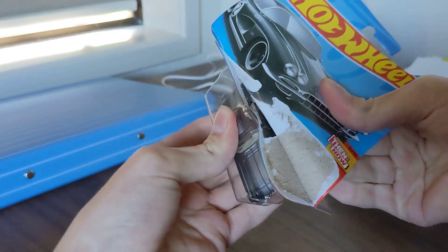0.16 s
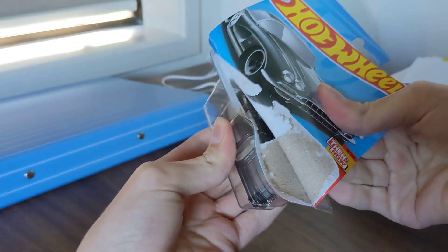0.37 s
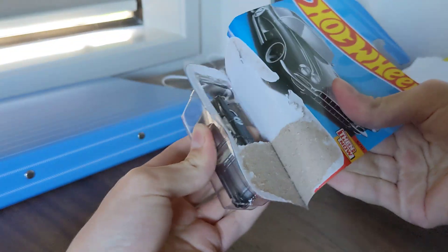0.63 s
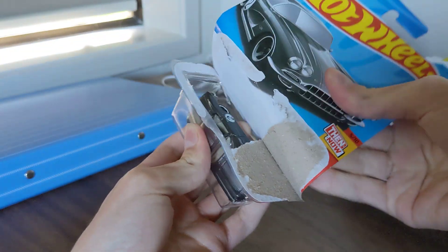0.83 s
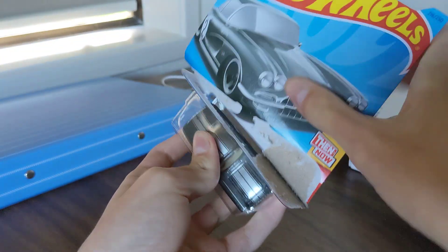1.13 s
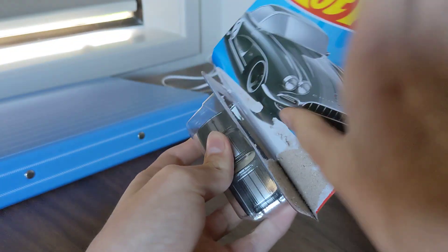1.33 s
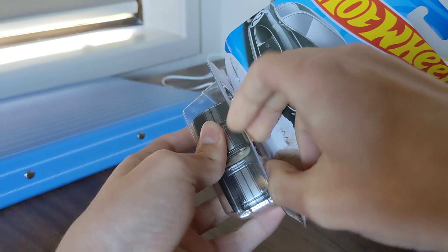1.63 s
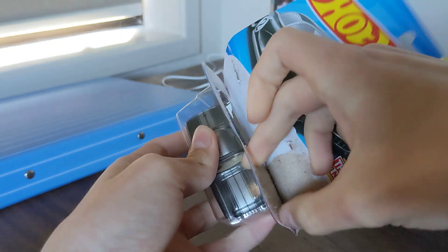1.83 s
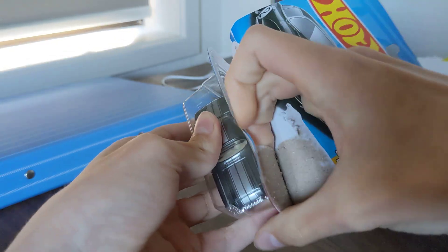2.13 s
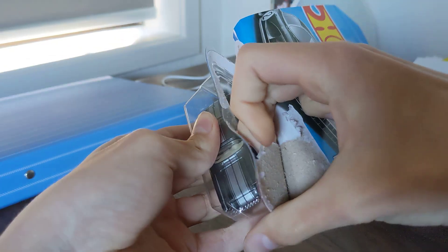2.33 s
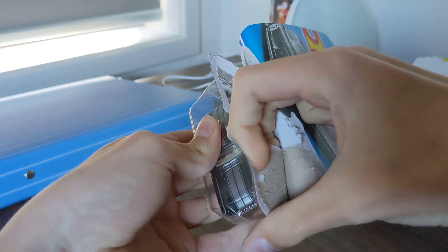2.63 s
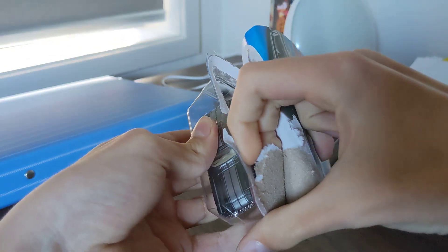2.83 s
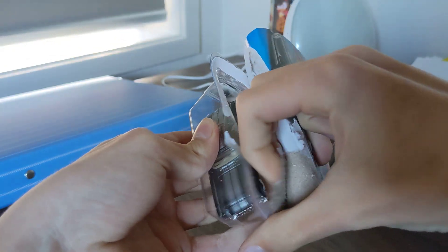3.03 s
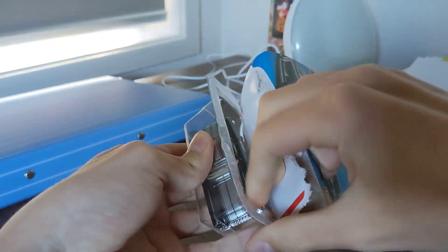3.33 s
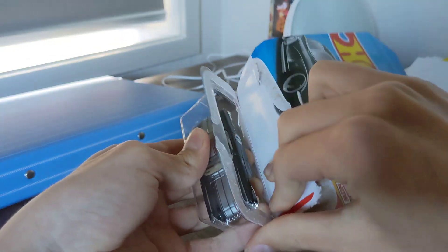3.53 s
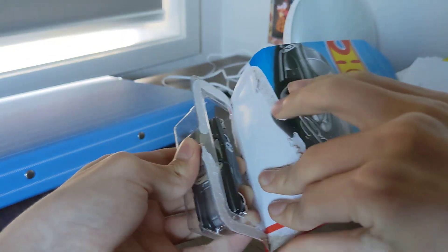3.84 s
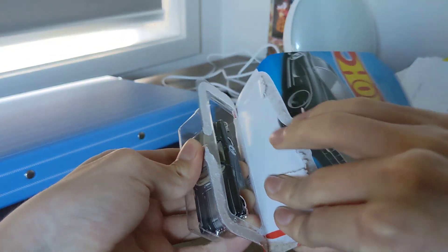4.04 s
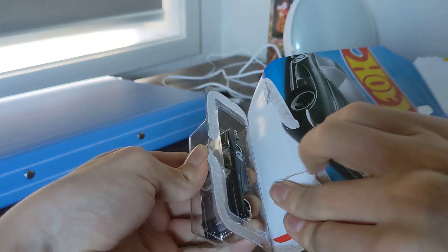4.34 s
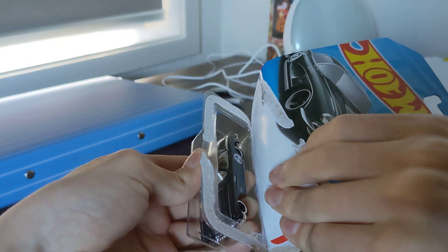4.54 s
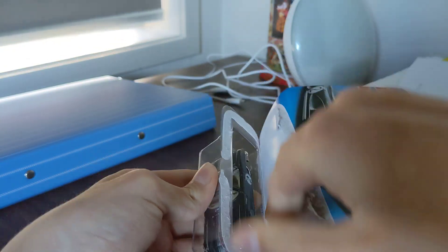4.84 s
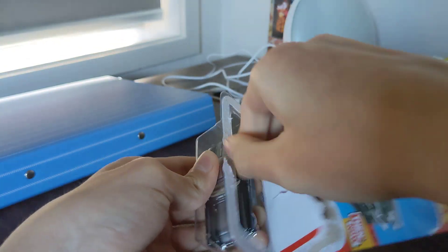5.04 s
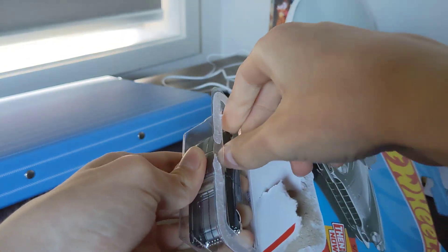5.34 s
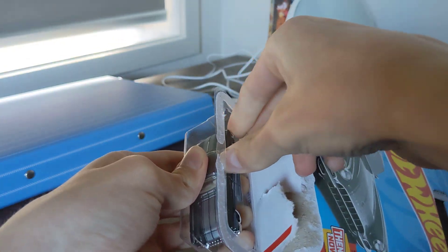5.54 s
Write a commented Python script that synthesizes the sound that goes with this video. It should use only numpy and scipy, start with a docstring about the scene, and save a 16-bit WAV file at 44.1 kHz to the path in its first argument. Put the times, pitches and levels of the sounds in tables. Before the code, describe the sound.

In a small room, close to the microphone and a little left, thin plastic packaging is pried off a card in fits and starts. The plastic clicks, creaks and pops while the cardboard gives way in brief, dry rips. The strongest tear comes early, more clusters of crackling follow, and the last part thins to softer ticks and snaps. Barely audible bird chirps and a fading low hum lie underneath.

```python
"""Peeling a blister pack

Hands peel a plastic blister from its card in a small room, close to a phone and a little to its left.
Paper fibres fracture singly and in dense tears; stick-slip of the glue and buckling excite the shell's
modes as creaks and hollow pops. A short room tail, faint birds and a fading mains hum lie underneath."""
import sys
import numpy as np
from scipy import signal
from scipy.fft import rfft, irfft, next_fast_len
from scipy.io import wavfile
from scipy.ndimage import uniform_filter1d

SR = 44100
rng = np.random.default_rng(int(sys.argv[2]) if len(sys.argv) > 2 else 0)


def store_pcm(level_fs):
    """Save levels as 16-bit WAV."""
    pcm = np.round(np.clip(level_fs, -1, 1) * 32767).astype(np.int16)
    wavfile.write(sys.argv[1], SR, np.atleast_2d(pcm).T)


N = 250488
T = np.arange(N) / SR
LN_1000 = np.log(1000)  # an amplitude decay of 60 dB

# steady pull between the runs of tearing: time_s, tear_db, creak_db, treble_db
STEADY_PULL = [(0.0, -58, -46.5, 8.5), (0.35, -49.5, -72, -3.5), (0.74, -66.5, -69, -0.5),
               (0.96, -67.5, -72, -26), (1.19, -49.5, -53, -21), (1.3, -71, -65.5, -36),
               (1.659, -61, -63, -9), (2.15, -69, -71.5, -26), (2.2, -66.5, -68, 13),
               (2.47, -54, -55.5, -0.5), (3.11, -67.5, -64.5, 8.5), (3.3, -63, -64.5, -9.5),
               (3.69, -70.5, -68, 10.5), (4.061, -55, -82, -5), (4.511, -61, -84, 0.5),
               (4.97, -64, -65, -8), (5.36, -64.5, -66, -19), (5.68, -71.5, -72.5, 7)]
# buckling of the shell: start_s, level_db, centre_hz
BUCKLES = [(0.266, -18, 710), (0.419, -19.5, 760), (0.45, -7.5, 1032), (0.626, -41.5, 1300),
           (0.869, -47, 1330), (0.919, -29.5, 460), (1.083, -35.5, 420), (1.088, -29, 543),
           (1.152, -35, 1820), (1.246, -16.5, 930), (1.323, -31.5, 1300), (1.511, -42, 1340),
           (1.569, -29, 830), (1.59, -28, 1200), (1.9, -33.5, 940), (1.958, -40, 800), (2.331, -43, 1410),
           (2.363, -40, 1720), (2.381, -28, 1510), (2.449, -34, 2040), (2.531, -36, 1900),
           (2.572, -38, 1682), (2.623, -38, 1670), (2.77, -33, 1900), (2.9, -36, 1760),
           (3.103, -28.5, 1480), (3.146, -18.5, 1800), (3.292, -37.5, 814), (3.439, -36.5, 1440),
           (3.473, -37, 1360), (3.489, -26, 1670), (3.549, -41.5, 930), (4.023, -47, 1850),
           (4.073, -41, 2260), (4.832, -50, 1240), (4.881, -60, 1260), (4.952, -38.5, 634),
           (5.088, -48, 1560), (5.165, -31, 1810), (5.288, -36.5, 1820), (5.322, -26, 1970),
           (5.522, -47, 1350)]
# modes of shell and card: frequency_hz, bandwidth_hz, gain_db
SHELL_MODES = [(348.6, 200, -17.5), (526, 360, -3), (810, 277, -2), (1168, 150, -6.5), (1382, 85, -3),
               (1626, 240, -3), (1836, 210, -1.5), (2296, 170, -2.5), (3260, 170, -6.5)]
# spectrum of tearing paper: frequency_hz, gain_db
PAPER_SPECTRUM = [(1180, -29.5), (2000, -21), (2830, -11), (3260, -13), (4450, -10.5), (5780, -14),
                  (7060, -11.5), (7640, -16), (8400, -13.5), (10600, -19), (11600, -14.5), (15100, -13),
                  (16000, -7)]


def peel():
    """Fibre fracture makes dense clicks; stick-slip of the glue drives the modes near the buckling pitch."""
    time_s, tear_db, creak_db, _ = np.transpose(STEADY_PULL)
    steady = undb([np.interp(T, time_s, tear_db), np.interp(T, time_s, creak_db)])
    tear, creak = tearing_runs() + steady
    buckle_s, _, buckle_hz = np.transpose(BUCKLES)
    centre_hz = np.interp(T, buckle_s, buckle_hz)
    fibres = clicks(per_s=9000, spread_db=2.5) * undb(1.9 * walk(150))
    slips = clicks(per_s=3400, spread_db=2.5) * undb(2.46 * walk(80))
    shell, power = 0, 0
    for k, (hz, width, db) in enumerate(SHELL_MODES):
        share = undb(db - 3.94 * np.log2(hz / centre_hz) ** 2)
        mode = unit(resonate(slips, hz, q=hz / width)) * (-1) ** k
        shell = shell + share * undb(1.3 * walk(25)) * mode
        power = power + share ** 2
    return tear * unit(colour(fibres, PAPER_SPECTRUM)) + creak * shell / np.sqrt(power)


def tearing_runs():
    """Envelopes of tearing and creaking: each run swells, holds and decays exponentially."""
    # runs of tearing: start_s, rise_s, hold_s, t60_s, tear_db, creak_db
    runs = [(0.146, .003, 0.0084, 0.2, -59, -69), (0.246, 0.015, .021, 0.19, -53, -38.5),
            (0.411, .005, 0.0088, .12, -29, -42), (0.427, 0.021, 0.024, 0.18, -19, -21.5),
            (0.692, 0.042, 0.018, 0.11, -51, -57), (0.894, 0.0033, 0.038, 0.17, -59, -57),
            (1.032, 0.053, 0.0097, 0.048, -55, -36.5), (1.138, 0.0077, 0.036, 0.22, -55, -46),
            (1.234, .003, 0.035, 0.16, -35, -35.5), (1.317, 0.0045, 0.02, 0.029, -55, -49.5),
            (1.438, 0.038, 0.017, 0.1, -50.5, -53), (1.501, 0.011, 0.072, 0.15, -42, -42.5),
            (1.648, 0.043, 0.021, .043, -44.5, -48.5), (1.874, .012, 0.077, 0.041, -50.5, -52),
            (2.32, 0.076, 0.046, .16, -38, -39), (2.524, 0.0032, 0.016, 0.16, -44, -82),
            (2.758, 0.0087, 0.028, 0.13, -47.5, -47.5), (2.893, 0.0045, .14, .1, -60.5, -55.5),
            (3.079, 0.023, 0.0068, 0.24, -41, -45), (3.133, 0.011, 0.016, 0.11, -26.5, -29.5),
            (3.266, 0.013, 0.016, 0.055, -40, -57), (3.418, 0.0048, 0.028, 0.1, -49, -50.5),
            (3.472, 0.014, 0.014, 0.17, -41, -39), (3.617, 0.006, .02, 0.066, -60.5, -84),
            (3.704, 0.0097, .03, 0.072, -57.5, -71), (3.861, 0.044, 0.023, 0.16, -50, -55),
            (4.02, 0.0024, 0.084, 0.056, -48.5, -58), (4.179, 0.028, 0.051, 0.097, -54, -61),
            (4.351, 0.0071, .05, 0.14, -59, -70.5), (4.524, .003, 0.031, 0.094, -57.5, -65.5),
            (4.879, 0.0012, 0.01, .093, -53.5, -47.5), (4.937, 0.0046, 0.042, 0.16, -51.5, -52),
            (5.142, 0.015, 0.017, 0.17, -45, -44.5), (5.31, 0.0039, .008, 0.17, -50, -49),
            (5.534, 0.014, 0.024, .12, -56.5, -56.5)]
    out = np.zeros((2, N))
    for start, rise, hold, t60, *db in runs:
        t = T - start
        swell = np.clip(t / rise, 0, 1) ** 2
        decay = np.exp(-LN_1000 * np.maximum(t - rise - hold, 0) / t60)
        out += undb(db)[:, None] * swell * decay
    return out


def snaps():
    """Brittle fracture: a millisecond crack with a short fizz, and an impulse that rings the shell."""
    # single fibres and glue spots letting go: start_s, relative_db
    fractures = [(0.1281, -39.5), (0.2083, -38), (0.223, -37), (0.2688, -28.5), (0.4189, -18.5),
                 (0.4489, -9.5), (0.626, -40), (0.7282, -43), (0.738, -30), (0.7465, -40), (0.919, -28),
                 (1.062, -34), (1.0874, -32), (1.2461, -24), (1.324, -36), (1.5274, -36), (1.5529, -29),
                 (1.7, -27), (1.9031, -29), (2.212, -48), (2.2337, -47.5), (2.297, -41), (2.3371, -43),
                 (2.354, -49), (2.3635, -31), (2.375, -26.5), (2.3818, -26), (2.409, -35), (2.417, -20),
                 (2.43, -35), (2.4501, -26), (2.474, -41), (2.5316, -30), (2.5494, -39), (2.6244, -43),
                 (2.7601, -61), (2.7823, -32), (2.827, -41.5), (2.8842, -43), (2.8988, -41), (2.9526, -41),
                 (3.1035, -30.5), (3.1352, -15), (3.4156, -38), (3.474, -36), (3.491, -24.5), (3.5503, -45),
                 (3.7045, -55), (3.718, -53), (3.731, -39), (3.742, -50), (3.784, -36.5), (3.848, -45),
                 (3.9097, -35), (3.966, -40), (4.0228, -32), (4.0695, -31), (4.0987, -26), (4.229, -45),
                 (4.2696, -43), (4.468, -45), (4.534, -46.5), (4.6359, -45), (4.952, -38), (5.1594, -31),
                 (5.2885, -43), (5.3246, -30), (5.3858, -38.5), (5.5822, -43)]
    crack, knock, t = np.zeros(N), np.zeros(N), np.arange(900) / SR
    burst = np.exp(-((t - .002) / 0.00089) ** 2)
    fizz = .08 * (t > .002) * np.exp(-t / 0.02)
    for start, db in fractures + small_snaps():
        add(crack, start - .001, undb(db) * (burst + fizz) * rng.standard_normal(len(t)))
        add(knock, start, undb(db - 13.5) * shell_ring(2900, base_t60_s=0.03, focus_db=4.5))
    return undb(10) * colour(crack, PAPER_SPECTRUM) + knock


def small_snaps(per_s=12, above_tear_db=3.5, spread_db=4):
    """A random point process: times and levels of faint snaps, louder where the steady tearing is."""
    time_s, tear_db = np.transpose(STEADY_PULL)[:2]
    position, size = rng.random((int(per_s * N / SR), 2)).T
    starts = .002 + position * (N / SR - .002)
    levels = np.interp(starts, time_s, tear_db) + above_tear_db - spread_db * np.log(1 - size)
    return list(zip(starts, levels))


def brighten(x):
    """A varying treble shelf follows the peel: thin paper tears brighter than thick card."""
    time_s, _, _, treble_db = np.transpose(STEADY_PULL)
    return x + (undb(np.interp(T, time_s, treble_db)) - 1) * highpass(x, 6500, order=1)


def pops(ring_cycles=36):
    """Buckling excites the shell's modes in hollow pops; low pops ring longer."""
    out = np.zeros(N)
    for start, db, hz in BUCKLES:
        add(out, start, undb(db) * shell_ring(hz, base_t60_s=ring_cycles / hz, focus_db=8.0))
    return highpass(out, 290, order=2)  # a small shell radiates little bass


def shell_ring(centre_hz, base_t60_s, focus_db):
    """Free vibration as a sum of damped modes, weighted towards centre_hz; peak 1."""
    t = np.arange(4000) / SR
    hz, width, db = np.transpose(SHELL_MODES)
    uneven, detune = rng.standard_normal((2, len(hz)))
    gain = undb(db - focus_db * np.log2(hz / centre_hz) ** 2 + 3.5 * uneven)
    damping = LN_1000 / base_t60_s + 0.58 * width  # broad modes die sooner
    phase = 2 * np.pi * hz * (1 + 0.058 * detune) * t[:, None]
    x = (gain * np.sin(phase) * np.exp(-damping * t[:, None])).sum(1)
    x *= 1 - np.exp(-t / 0.0019)  # the fold takes a moment to give
    return x / np.abs(x).max()


def thuds(t60_s=.11):
    """The card flexes like a membrane after some pops: soft, uneven bumps whose pitch sags and wobbles."""
    # flexing of the card: start_s, level_db, nominal_hz
    flexes = [(0.454, -40, 307), (0.925, -40, 175), (1.097, -52, 195), (1.249, -37.5, 186),
              (1.512, -39, 242), (1.57, -46.5, 298), (3.141, -46, 280), (5.166, -50, 241)]
    out, t = np.zeros(N), np.arange(SR // 5) / SR
    wobble = 1 + .22 * walk(120)
    sag = .75 + .9 * np.exp(-t / .012)
    envelope = (1 - np.exp(-t / 0.005)) * np.exp(-LN_1000 * t / t60_s)
    for start, db, hz in flexes:
        add(out, start, undb(db) * envelope * sine(hz * sag * wobble[int(start * SR):][:len(t)]))
    return out * undb(4 * walk(90))


def direct_path(x, lag_s=1.0e-4):
    """Time and level differences: the sound reaches the left microphone port first and louder."""
    # left-over-right emphasis, applied in part to each port: frequency_hz, emphasis_db
    pan = [(60, -19), (150, 2), (380, 4), (950, 5), (2380, 3), (5980, 13), (15000, 8.5)]
    return np.array([colour(x, pan, share=0.14), colour(x, pan, share=-0.75, lag_s=lag_s)])


def scattering(x, paths=5):
    """Early reflections off moving hands and card give each port a changing treble colour."""
    t, out = np.arange(300) / SR, 0
    for _ in range(paths):
        response = highpass(rng.standard_normal((2, len(t))) * np.exp(-t / 0.0017), 1800, order=1)
        response /= np.sqrt((response ** 2).sum(1, keepdims=True))
        out = out + signal.fftconvolve((x * walk(60))[None], response, axes=1)[:, :N]
    return undb(-3) * out / np.sqrt(paths)


def reverberation(x):
    """A diffuse field: each port gets its own noise tail, decaying exponentially band by band."""
    # decay of the room: centre_hz, t60_s, gain_db
    bands = [(150, .3, 18), (590, 0.38, 17.5), (2160, 0.18, 20.5), (5960, 0.29, 18), (13360, 0.27, 6)]
    t, tail = np.arange(SR // 3) / SR, 0
    onset = np.minimum(t / .006, 1)
    for hz, t60, db in bands:
        band = resonate(rng.standard_normal((2, len(t))), hz, q=.8)
        envelope = onset * np.exp(-LN_1000 * t / t60)
        tail = tail + undb(db) * band * envelope / np.sqrt(SR * LN_1000 / t60)
    return signal.fftconvolve(x[None], tail, axes=1)[:, :N]


def birds(start_hz=4600, fall_hz_per_s=8000):
    """Falling whistles beyond the window, roughened by random frequency modulation."""
    # bird calls: start_s, length_s, relative_db
    calls = [(0.305, 0.14, -61), (0.971, 0.16, -61.5), (1.993, 0.17, -65.5), (4.12, 0.11, -61.5),
             (4.734, 0.14, -66), (4.882, 0.15, -57), (5.514, 0.22, -59)]
    out, waver_hz = np.zeros(N), 320 * walk(500)
    for start, length, db in calls:
        progress = np.linspace(0, 1, int(length * SR))
        hz = start_hz - fall_hz_per_s * length * progress + waver_hz[:len(progress)]
        add(out, start, undb(db) * np.sin(np.pi * progress) ** .5 * sine(hz))
    return out


def room_tone(level_db=-66):
    """Ambient noise, coherent between the two ports in the bass."""
    # spectrum of the quiet room: frequency_hz, gain_db
    spectrum = [(18, -34.5), (30, -2), (141, -1), (889, -18.5), (1160, -17.5), (1430, -16), (2120, -31),
                (2290, -17.5), (3580, -20.5), (12300, -28.5), (16000, -28)]
    mid, side = rng.standard_normal((2, N))
    side = colour(side, [(60, -10.0), (300, -10.5), (800, 1.5)])
    tone = colour(np.array([mid + side, mid - side]), spectrum) * undb(0.5 * walk(7.6))
    return undb(level_db) * unit(tone)


def mains_hum(pitch_hz=100):
    """A pure tone that drifts slightly in pitch and dies away."""
    # course of the hum: time_s, rms_db
    levels = [(0.0, -69), (0.9, -71.5), (1.8, -75), (2.2, -64.5), (3.0, -68), (4.24, -96), (4.589, -84),
              (5.68, -89)]
    time_s, db = np.transpose(levels)
    return np.sqrt(2) * undb(np.interp(T, time_s, db)) * sine(pitch_hz + 0.65 * walk(1.3))


def undb(db):
    """Decibels to amplitude ratio."""
    return 10 ** (np.asarray(db) / 20)


def unit(x):
    """Normalise to an RMS of 1."""
    return x / np.sqrt(np.mean(x ** 2))


def sine(hz):
    """An oscillator whose phase is the integral of its frequency."""
    return np.sin(2 * np.pi * np.cumsum(hz) / SR)


def colour(x, table, share=1., lag_s=0.):
    """Filter by (frequency_hz, gain_db) points joined on a log axis, and delay."""
    size = next_fast_len(N)
    hz = np.arange(size // 2 + 1) * SR / size + 0.0018
    point_hz, db = np.transpose(table)
    gain = undb(share * np.interp(np.log(hz), np.log(point_hz), db))
    return irfft(rfft(x, size) * gain * np.exp(-2j * np.pi * hz * lag_s), size)[..., :N]


def resonate(x, hz, q):
    """One resonance, gain 1 at its centre."""
    return signal.lfilter(*signal.iirpeak(hz, q, SR), x)


def highpass(x, hz, order):
    """A maximally flat high-pass filter."""
    return signal.sosfilt(signal.butter(order, hz, "high", fs=SR, output="sos"), x)


def walk(per_s):
    """Slow modulation: random levels joined by ramps; spread near 1."""
    step = int(SR / per_s)
    return 1.03 * uniform_filter1d(np.repeat(rng.standard_normal(N // step + 1), step), step)[:N]


def clicks(per_s, spread_db):
    """Shot noise: impulses at random moments, most small and a few large."""
    chance, polarity, size = rng.random((3, N))
    return (chance < per_s / SR) * np.sign(polarity - .5) * undb(-spread_db * np.log(1 - size))


def add(track, start_s, x):
    """Superpose x on the track."""
    i = int(start_s * SR)
    track[i:i + len(x)] += x[:N - i]


def scene():
    """Direct, scattered and reverberant sound superpose; the distant birds are mostly reverberant."""
    pack = brighten(peel() + snaps()) + thuds() + pops()
    far = birds()
    near = direct_path(pack) + scattering(pack)
    return near + reverberation(pack + undb(13.0) * far) + 0.23 * far + room_tone() + mains_hum()


def record(dry):
    """Band limiting: the phone drops the deep bass and cuts the top."""
    top_cut = signal.ellip(10, .2, 80, 15900, fs=SR, output="sos")
    return signal.sosfilt(top_cut, highpass(dry, 50, order=4))


dry = scene()
out = record(dry)
store_pcm(out)
```